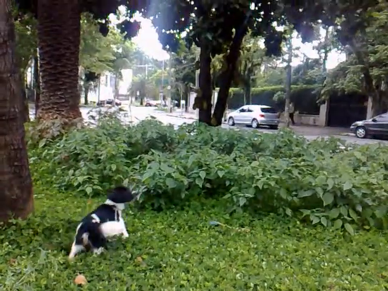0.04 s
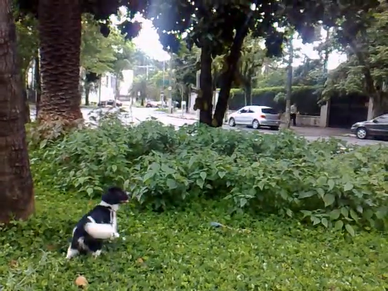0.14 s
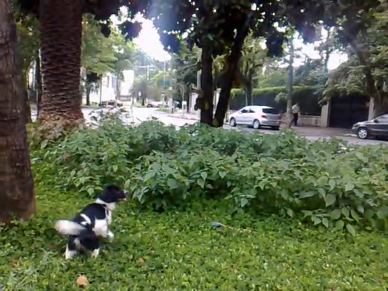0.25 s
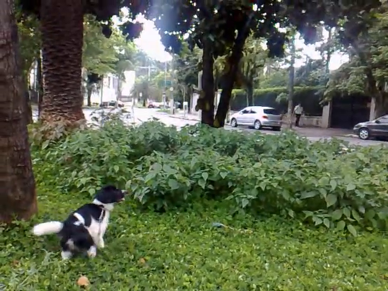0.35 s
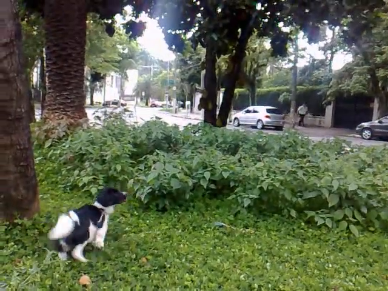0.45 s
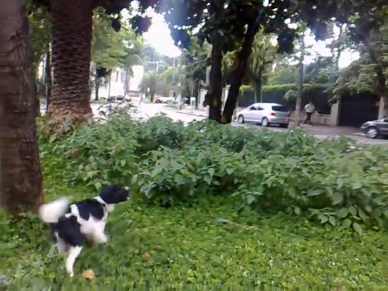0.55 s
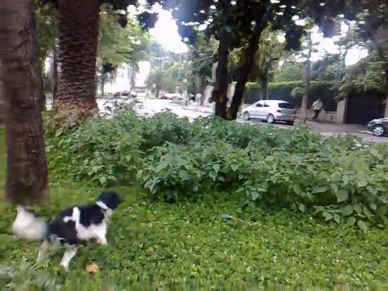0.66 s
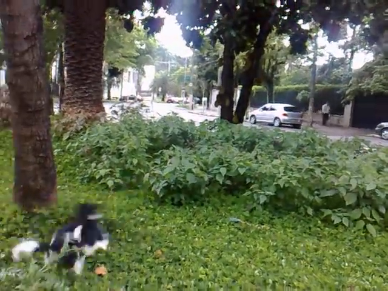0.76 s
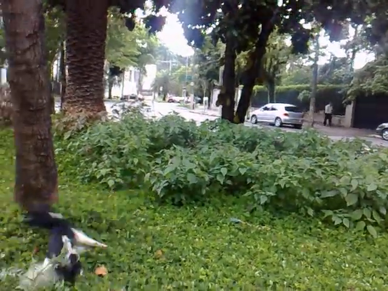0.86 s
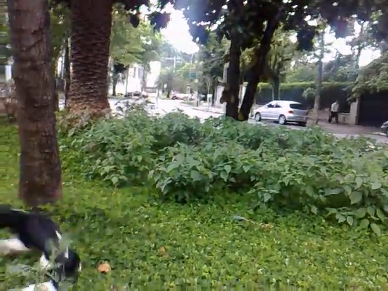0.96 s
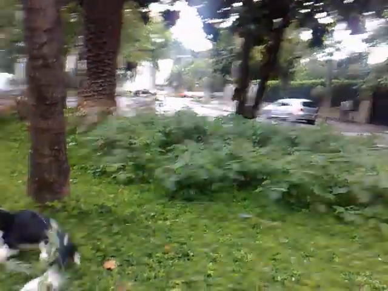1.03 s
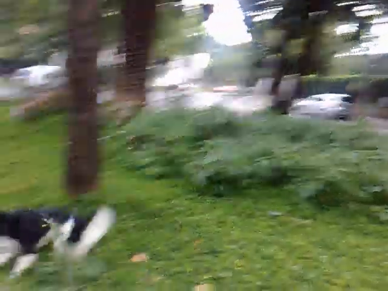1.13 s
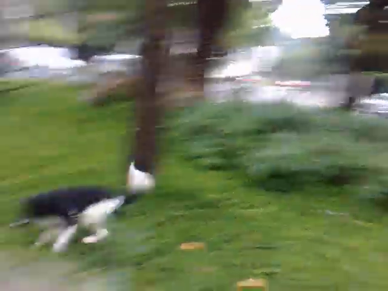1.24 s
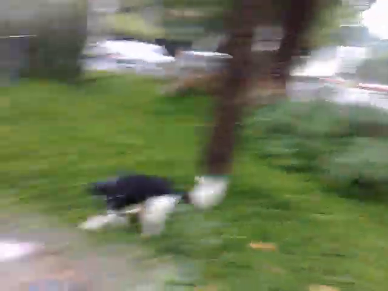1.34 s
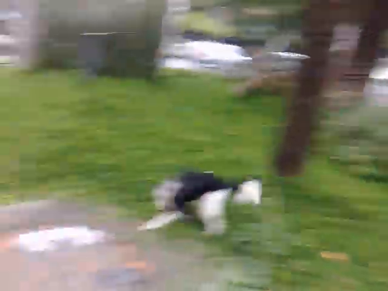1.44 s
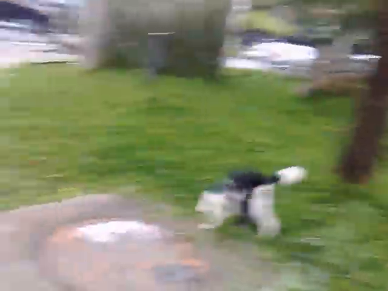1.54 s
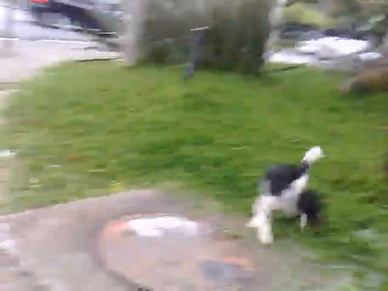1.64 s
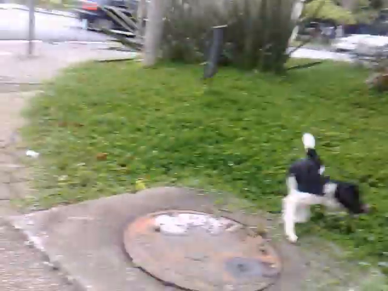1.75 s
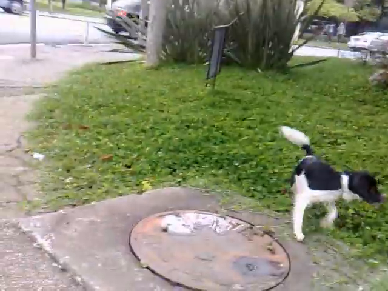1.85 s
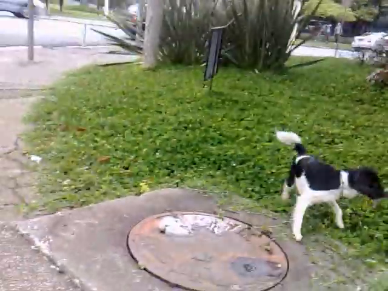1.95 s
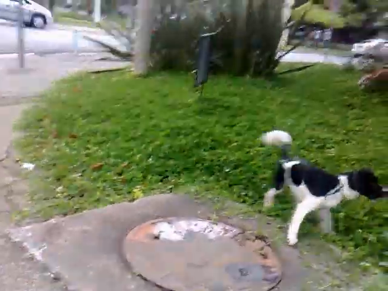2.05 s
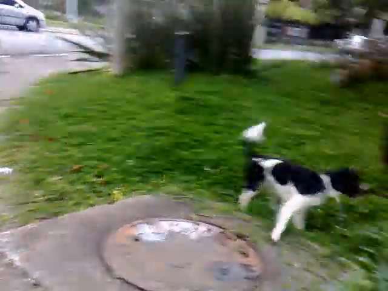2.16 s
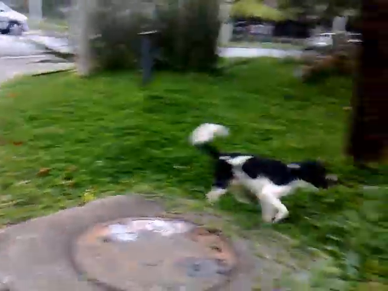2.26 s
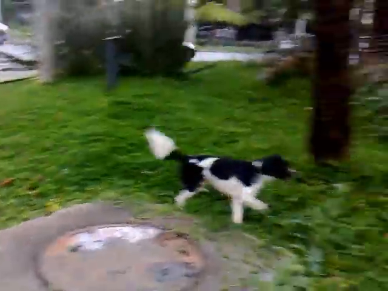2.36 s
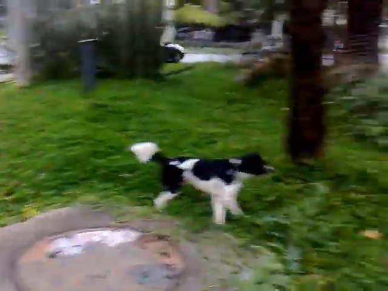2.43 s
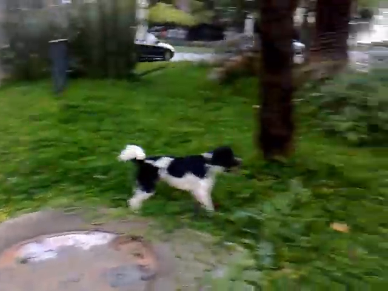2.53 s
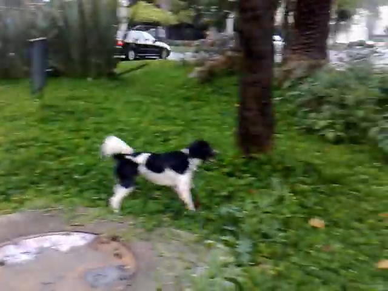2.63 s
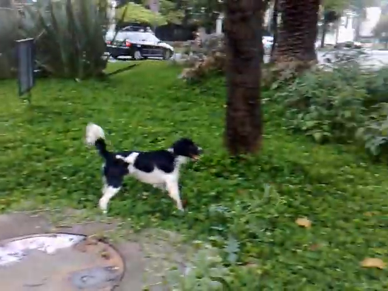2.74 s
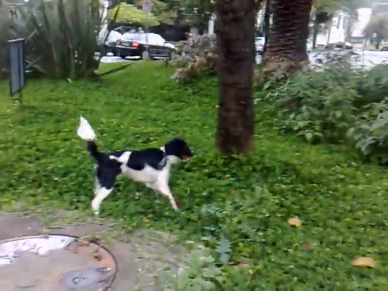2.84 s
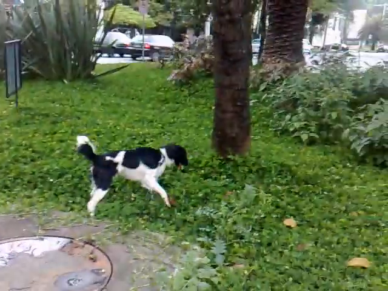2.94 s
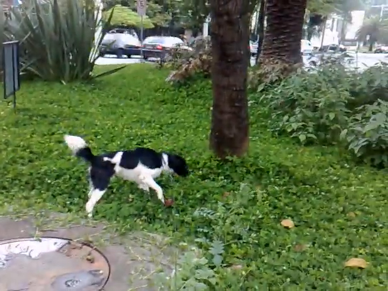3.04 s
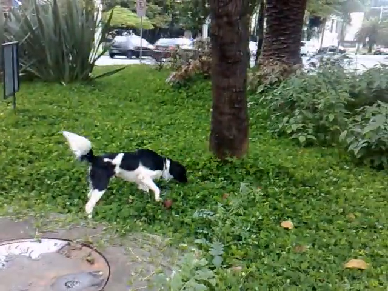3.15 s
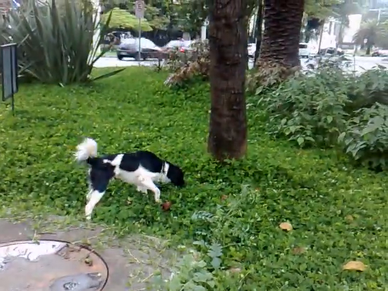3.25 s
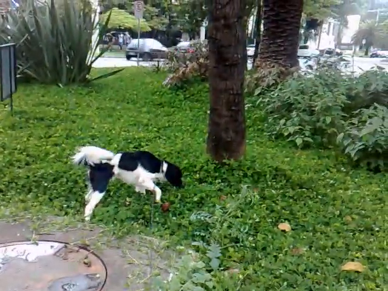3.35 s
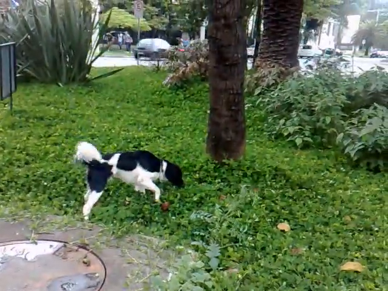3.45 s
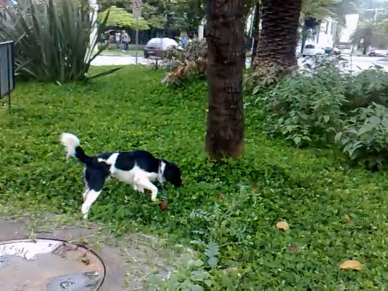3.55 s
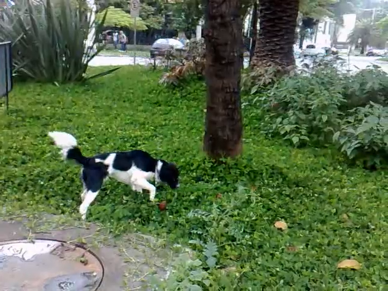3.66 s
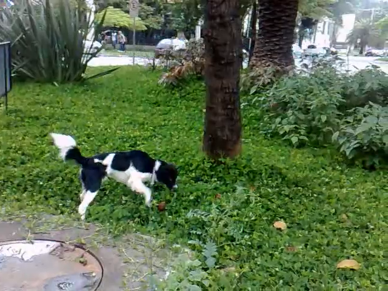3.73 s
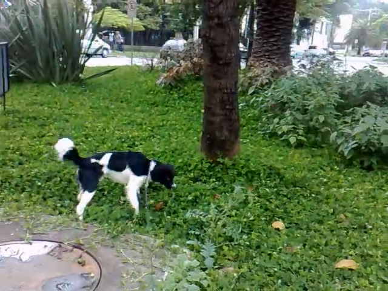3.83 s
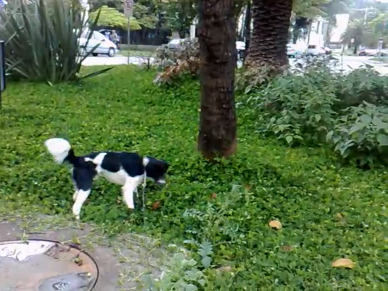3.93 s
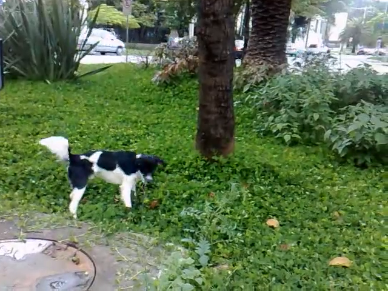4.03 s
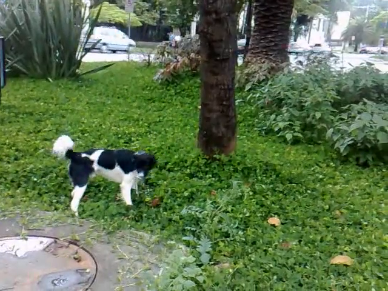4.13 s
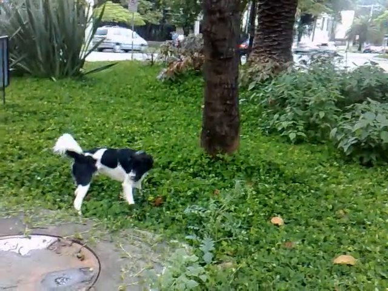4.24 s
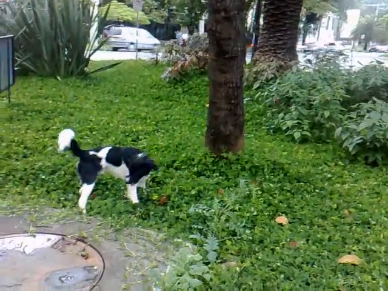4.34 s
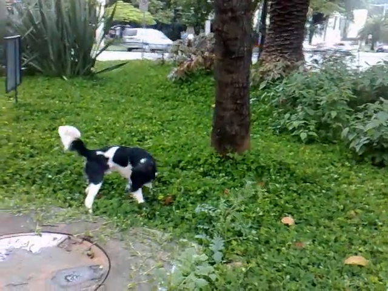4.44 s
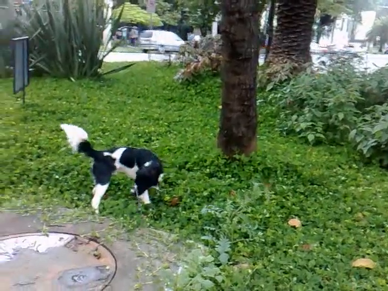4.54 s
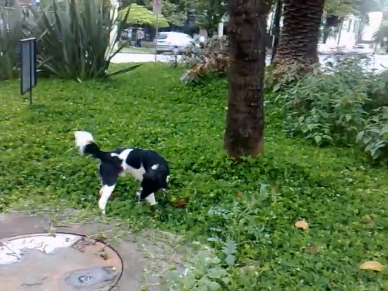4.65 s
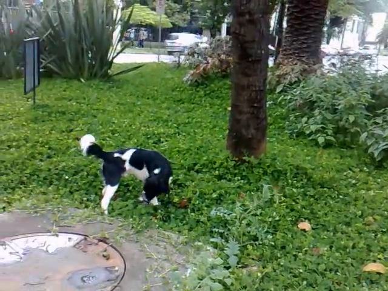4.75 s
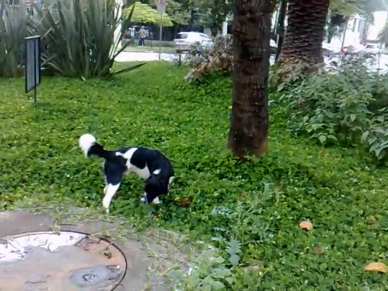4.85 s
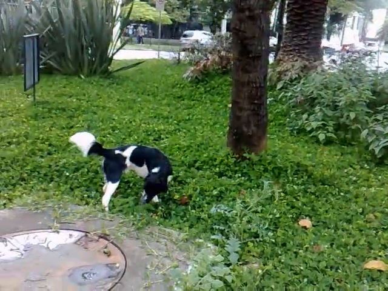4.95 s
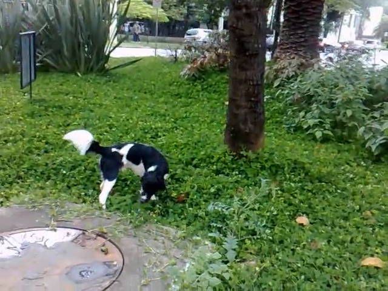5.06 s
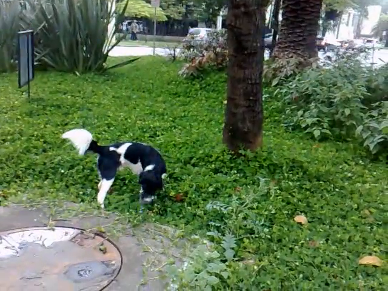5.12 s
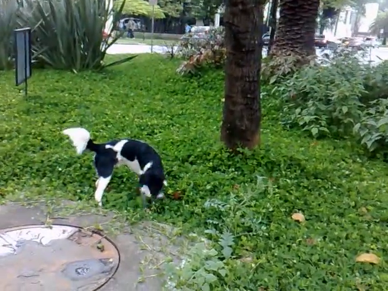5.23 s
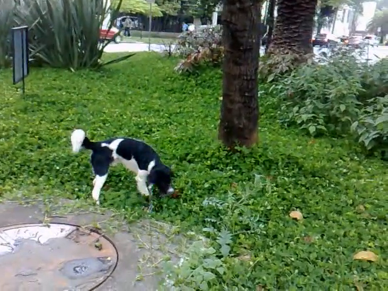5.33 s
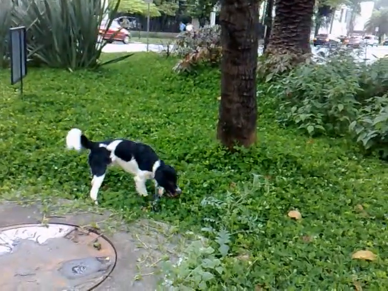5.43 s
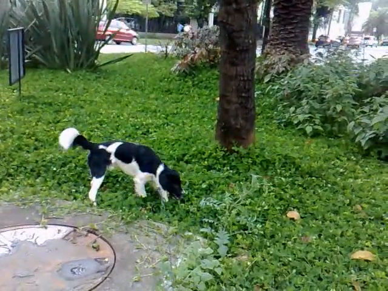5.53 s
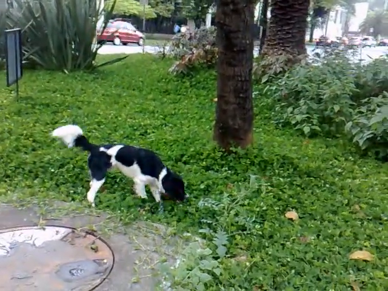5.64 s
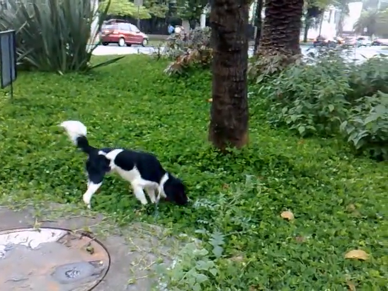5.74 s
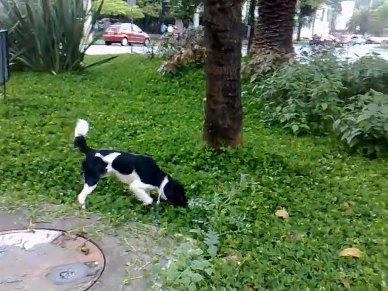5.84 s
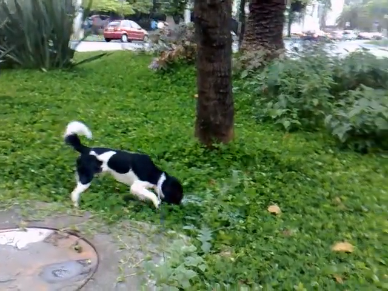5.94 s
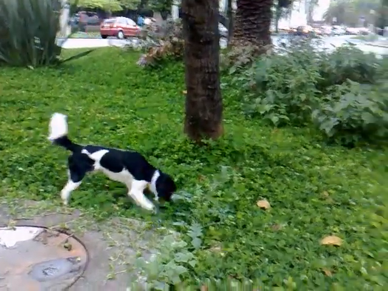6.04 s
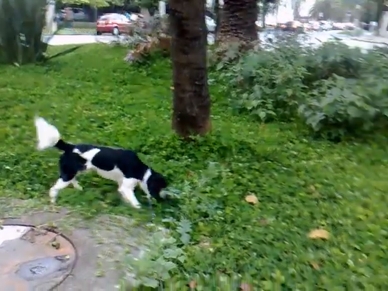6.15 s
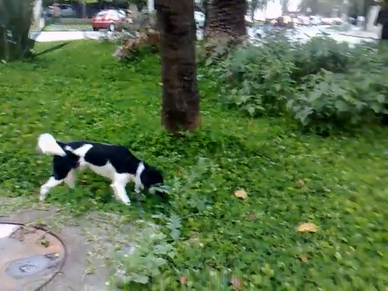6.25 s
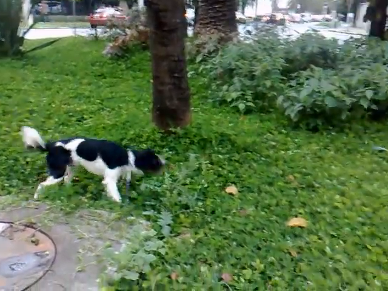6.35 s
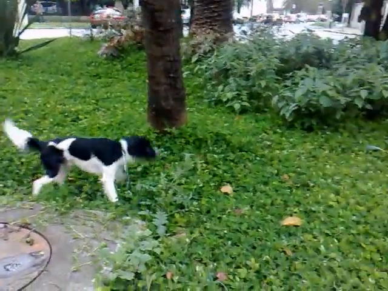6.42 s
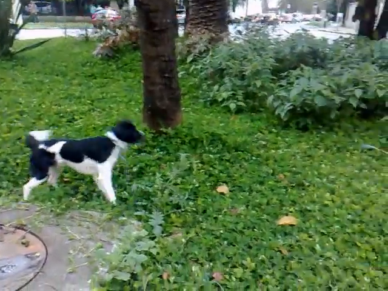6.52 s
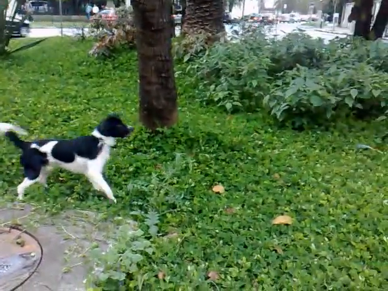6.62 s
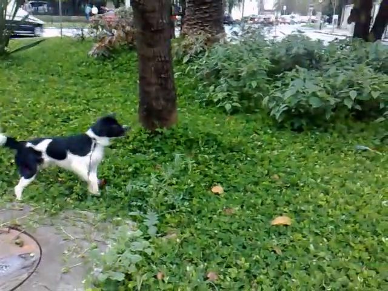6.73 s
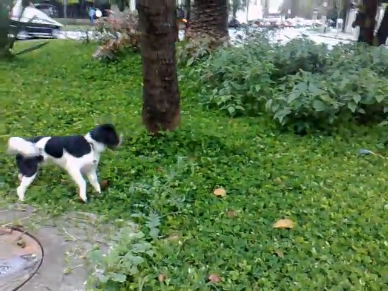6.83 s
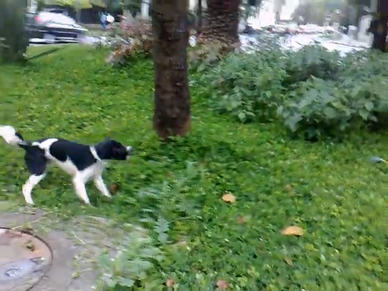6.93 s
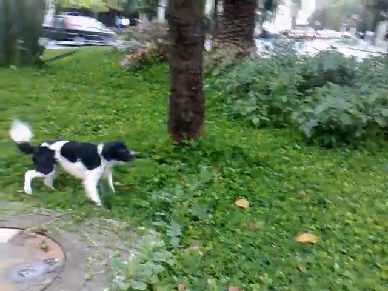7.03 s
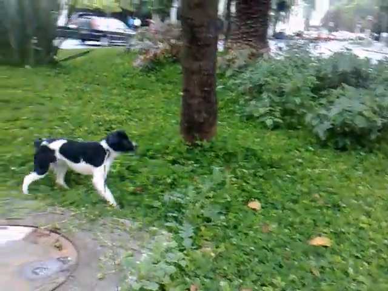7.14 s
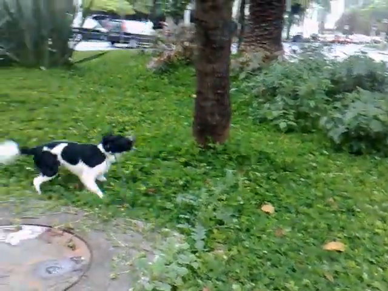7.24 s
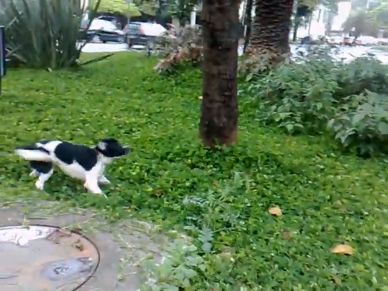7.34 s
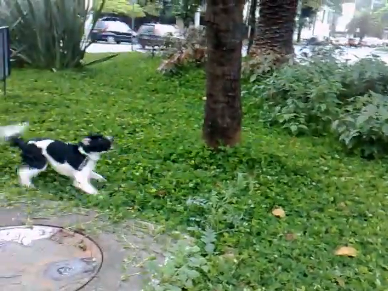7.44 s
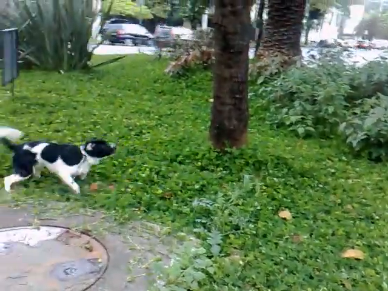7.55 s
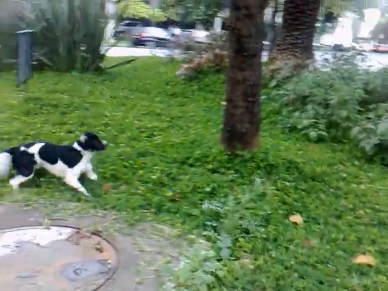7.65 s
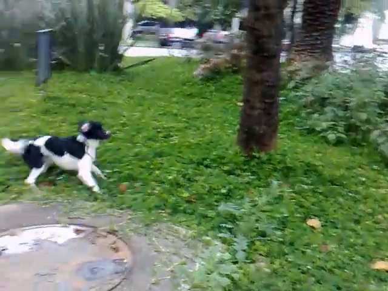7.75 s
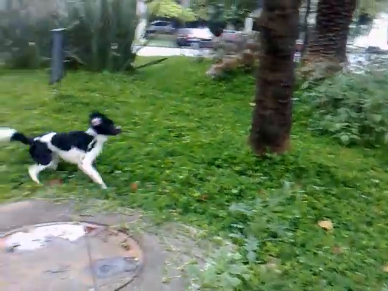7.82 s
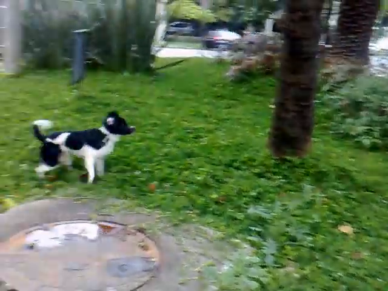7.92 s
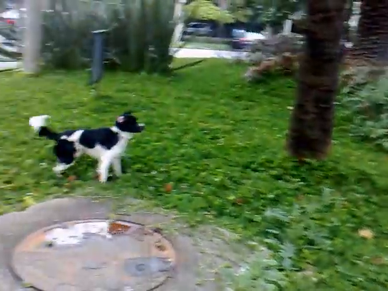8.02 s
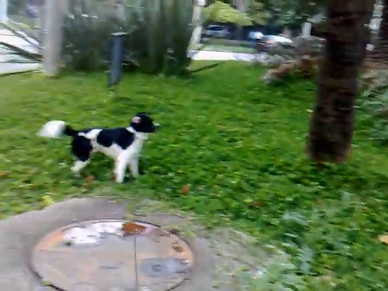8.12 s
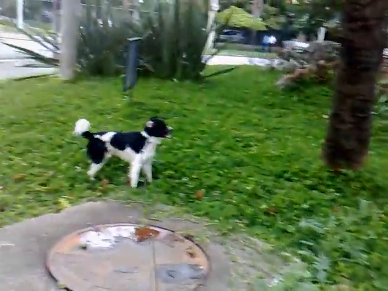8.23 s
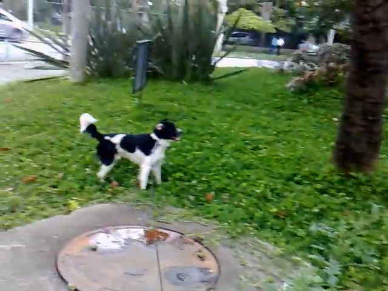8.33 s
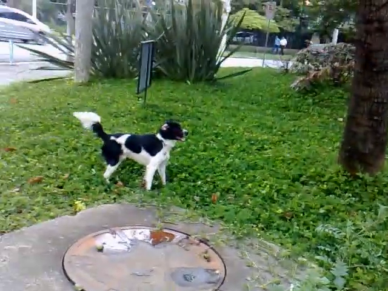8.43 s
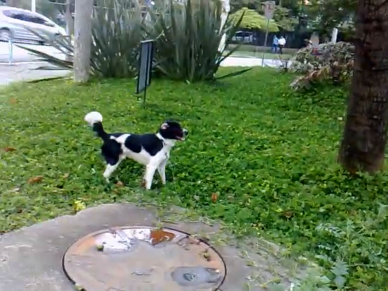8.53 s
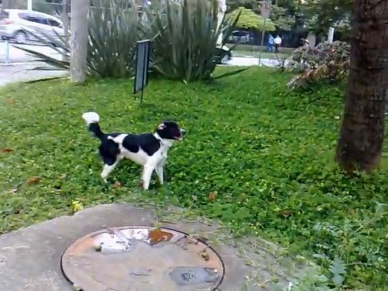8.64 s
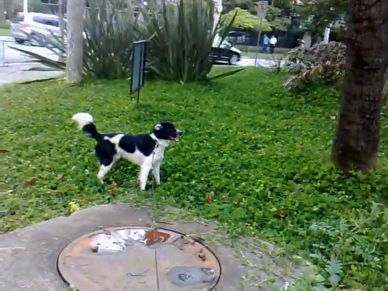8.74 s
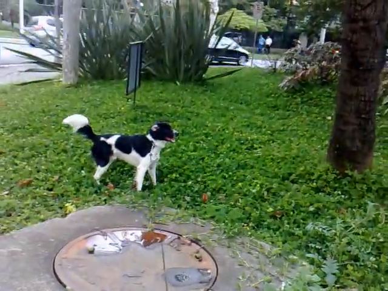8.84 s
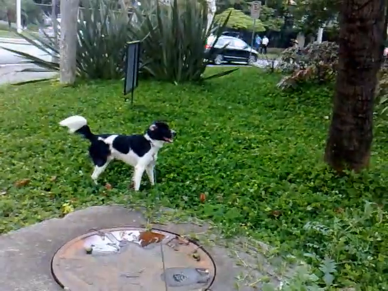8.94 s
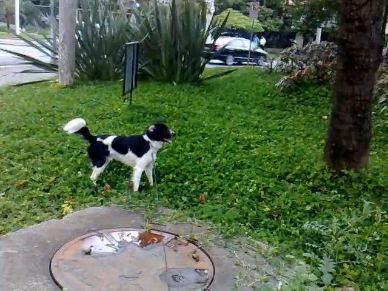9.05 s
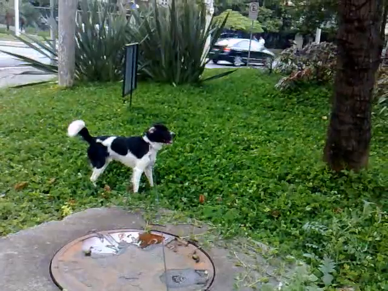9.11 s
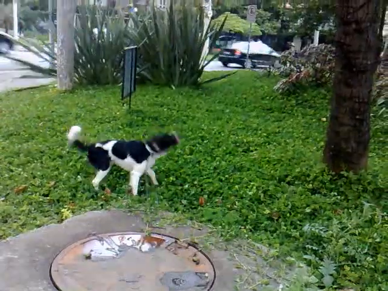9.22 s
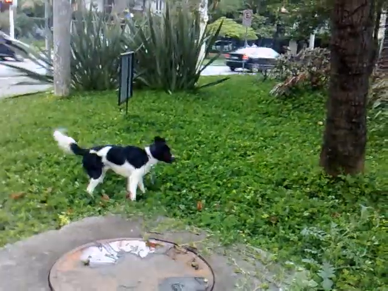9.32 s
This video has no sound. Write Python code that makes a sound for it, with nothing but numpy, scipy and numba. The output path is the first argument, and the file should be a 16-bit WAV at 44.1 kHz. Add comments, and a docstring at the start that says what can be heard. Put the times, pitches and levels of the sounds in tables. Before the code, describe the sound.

A steady hum of tyres and engines from a busy street runs throughout, with a faint high hiss behind it. At about 0.8 seconds a dog close to the microphone gives one short, harsh, high bark as a car passes. Paws rustle faintly in the leaves, and at 2.2 seconds something snaps once, sharply. More engines swell softly and fade around 3 and 5 seconds, and a distant brake squeals very faintly between 4 and 4.5 seconds. At 6.5 seconds the dog barks again with a brief leafy rustle, followed by three quick barks at about 7.1, 7.4 and 7.7 seconds. A last, slightly softer bark comes at the very end, near 9.4 seconds. The barks are loud and a little distorted, with a slight outdoor echo; the traffic dips after them and slowly comes back.

```python
"""Traffic hums on a busy street; then a dog close by on the grass gives the first of six short, harsh barks.
Tyres roar as broadband noise, exhausts swell and fade as harmonic tones, and a far brake sings faintly.
A faint high hiss lies behind. Paws rustle in the leaves, and something snaps once, ringing a hard body.
Each bark is a source and a filter: irregular vocal folds and turbulent breath excite throat and mouth.
The barks overload a small recorder, whose gain control ducks the street and slowly lets it back."""
import sys
import numpy as np
from scipy import signal
from scipy.fft import rfft, irfft, next_fast_len
from scipy.io import wavfile
from scipy.ndimage import uniform_filter1d
from numba import njit

SR = 44100
rng = np.random.default_rng(int(sys.argv[2]) if len(sys.argv) > 2 else 0)


def wav_out(sig):
    """Save sig, one row per channel (or a flat mono array), as 16-bit PCM at SR to the path in sys.argv[1]."""
    wavfile.write(sys.argv[1], SR, np.round(np.clip(np.atleast_2d(sig).T, -1, 1) * 32767).astype(np.int16))


N = 413658
TIME = np.arange(N) / SR

# spectral shapes of the four noises: frequency_hz, relative_density_db
HISS_SPECTRUM = [(3000, -15), (7000, 3), (10000, -3), (12000, -4.5), (15500, -5.5)]
TYRE_SPECTRUM = [(210, -17), (350, 0.5), (520, 0.5), (650, 1), (850, 3.5), (1350, 3), (1850, 1), (2380, -1),
                 (2950, 1), (3490, -4), (4200, -13), (5000, -19.5), (6500, -20.5), (8200, -38.5),
                 (15000, -48)]
RUMBLE_SPECTRUM = [(12, -38), (20, -18), (48, 3), (87, 0.5), (128, -3), (273, -4.5), (409, -16), (500, -15),
                   (650, -40), (1100, -120)]
LEAF_SPECTRUM = [(2000, -19), (6000, 17.5), (8500, 5), (12000, 6), (16000, -57)]
# envelope of the faint high background hiss: time_s, level_db
HISS_ENVELOPE = [(0, -52.5), (2.2, -60.5), (6.4, -55.5), (6.8, -72), (8.5, -69), (9.38, -58)]
# envelope of the traffic: time_s, level_db
TRAFFIC_ENVELOPE = [(0, -29.5), (.7, -30.5), (1.1, -29), (1.9, -31), (2.6, -31), (4.2, -29.5), (6.3, -30.5),
                    (6.8, -28.5), (8, -32), (9.38, -31.5)]
# engines of passing cars: peak_s, half_length_s, level_db, firing_hz, climb_hz_per_s
PASSING_ENGINES = [(0.76, 0.67, -28, 85.7, 3.5), (3.05, 0.56, -33, 96.44, 19),
                   (5.3, 0.41, -39.5, 85.6, -36), (9.3, 1, -40, 94.4, -17.5)]
# squeals of a far brake: peak_s, half_length_s, level_db
BRAKE_SQUEALS = [(4.047, 0.055, -51.5), (4.44, 0.17, -59)]
# paws in the leaves: peak_s, half_length_s, level_db
PAW_STEPS = [(.2, 0.3, -52), (0.744, 0.06, -49), (1.284, 0.023, -47), (1.496, 0.015, -47),
             (1.595, 0.0036, -46), (1.86, .005, -54), (2.9, .012, -54), (3.37, .012, -53),
             (6.504, 0.02, -33), (7.001, 0.041, -59.5), (8.094, 0.022, -58)]
# a sharp snap and its second crack: start_s, peak_db
CRACKS = [(2.2229, 1), (2.2323, -17)]
# modes of the body that snaps: centre_hz, width_hz, gain_db
CRACK_MODES = [(850, 480, -1.5), (1450, 430, 7), (2740, 520, 11.5), (3090, 250, 1.5), (3660, 280, 4),
               (8130, 2100, -13.5), (11240, 3200, -35)]
# echoes off trunks and house fronts: delay_s, gain_db
REFLECTIONS = [(.021, -31), (.083, -26)]
# one bark a row: full_voice_s, attack_s, hold_s, release_s, level_db, pitch_hz, mid_hold_pitch_hz,
# roughness_ratio, mouth_opening_s, brightness_db
BARK_GESTURES = [(0.774, 0.048, 0.076, 0.064, -1.5, 780, 682, .74, 0.058, 0.5),
                 (6.477, .022, 0.084, 0.057, 0.5, 702.5, 917, 0.71, 0.0078, 3),
                 (7.131, .012, 0.09, 0.0363, 0, 640.5, 900, 0.65, 0.037, 3),
                 (7.398, .030, .078, 0.056, 1, 621.8, 857.6, 0.6, .004, 5),
                 (7.655, .042, .058, .058, -1.5, 660.3, 803.3, 0.52, 0.031, 4),
                 (9.352, 0.019, 0.09, .06, -6.5, 696, 643, 0.68, 0.0062, 8)]
# throat and mouth resonances, one list a bark: centre_hz, width_hz, gain_db
BARK_FORMANTS = [
    [(684, 98, 1), (801, 125, 1), (1250, 78, 1.5), (1686, 220, -1), (2007, 67, -7), (2910, 100, -7)],
    [(710, 117, 3.5), (950, 14.3, 12), (1338, 190, 0.5), (1980, 440, -7), (2404, 240, -21), (3150, 66, -13)],
    [(653, 60, 2.5), (884, 120, 0), (1260, 260, -2), (1756, 174, 1), (2690, 160, -10.5), (2770, 54, -16)],
    [(684, 94, 10), (868, 72, 6.5), (1292, 130, 2.5), (1679, 79, 10), (2540, 310, -14.5), (2890, 66, -16)],
    [(670, 80, 5.5), (773, 220, 5), (1350, 160, 2.5), (1584, 55, 9), (2650, 59, -12), (3167, 24, -9)],
    [(726, 290, 11.5), (985, 310, -24), (1180, 120, 11), (1465, 57, 6), (2025, 90, 4), (2780, 450, -16.5)],
]
# a low band near 230 Hz and a harsh upper edge common to all barks: centre_hz, width_hz, gain_db
LOW_BAND_AND_EDGE = [(229, 36, -17), (4100, 1170, -30), (5830, 280, -32), (9200, 1800, -41)]


def from_db(db):
    """Decibels to amplitude ratio."""
    return 10 ** (np.asarray(db) / 20)


def unit_rms(x):
    """Normalisation to unit power."""
    return x / np.sqrt(np.mean(x ** 2) + 1e-20)


def butter(x, hz, kind, order=2):
    """Butterworth filter, maximally flat in its passband."""
    return signal.sosfilt(signal.butter(order, hz, kind, fs=SR, output="sos"), x)


def drift(rate_hz, size=N):
    """Random modulation: linear interpolation between Gaussian values drawn at rate_hz."""
    place = np.arange(size) * rate_hz / SR
    knots = rng.standard_normal(size // 20)
    return np.interp(place, np.arange(len(knots)), knots)


def swell(peak_s, half_length_s, level_db):
    """Gaussian envelope with standard deviation half_length_s."""
    return from_db(level_db) * np.exp(-((TIME - peak_s) / half_length_s) ** 2 / 2)


def coloured_noise(spectrum):
    """Spectral shaping of white noise, at unit power."""
    hz, db = np.transpose(spectrum)
    size = next_fast_len(N)
    bins_hz = np.maximum(np.fft.rfftfreq(size, 1 / SR), 1)
    gain = from_db(np.interp(np.log(bins_hz), np.log(hz), db))
    return unit_rms(irfft(rfft(rng.standard_normal(size)) * gain, size)[:N])


@njit
def resonator(x, w, r):
    """Damped two-pole oscillator with pole radius r and a moving centre w in radians a sample."""
    y = np.zeros(len(x))
    for i in range(2, len(x)):
        y[i] = (1 - r * r) / 2 * (x[i] - x[i - 2]) + 2 * r * np.cos(w[i]) * y[i - 1] - r * r * y[i - 2]
    return y


def resonate(x, modes, shift=1, tilt_db_per_octave=0):
    """Superposition of modes, each filtered twice for steep skirts; shift scales their centres."""
    out = 0
    for hz, width_hz, db in modes:
        r = np.exp(-np.pi * width_hz * np.sqrt(2) / SR)
        w = 2 * np.pi * hz * shift / SR * np.ones(len(x))
        octaves = np.clip(np.log2(hz / modes[0][0]), 0, 1.5)
        out += from_db(db + tilt_db_per_octave * octaves) * resonator(resonator(x, w, r), w, r)
    return out


def background_hiss():
    """Shaped noise: a faint high hiss that drops away around the run of barks and slowly returns."""
    return from_db(np.interp(TIME, *np.transpose(HISS_ENVELOPE))) * coloured_noise(HISS_SPECTRUM)


def traffic(waver_db=0.5):
    """Incoherent sources add up to noise: tyre roar over the rumble of many engines."""
    street_db = np.interp(TIME, *np.transpose(TRAFFIC_ENVELOPE))
    rumble = from_db(waver_db * drift(11)) * coloured_noise(RUMBLE_SPECTRUM)
    return from_db(street_db) * (coloured_noise(TYRE_SPECTRUM) + rumble)


def engine(peak_s, half_length_s, level_db, firing_hz, climb_hz_per_s, overtone_db=-10, throb_db=4.0):
    """Periodic exhaust pulses radiate harmonics of the firing rate; the lowest three are heard."""
    hz = (firing_hz + climb_hz_per_s * (TIME - peak_s)) * (1 + 0.0189 * drift(15))
    phase = 2 * np.pi * np.cumsum(hz) / SR
    orders = sum(from_db(overtone_db * k + throb_db * drift(15)) * np.sin((k + 1) * phase)
                 for k in range(3))
    return swell(peak_s, half_length_s, level_db) * unit_rms(orders)


def brake(pitch_hz=8730, wander_hz=45, shiver_hz=110):
    """Random amplitude modulation spreads a tone into a thin, unsteady squeal."""
    phase = 2 * np.pi * np.cumsum(pitch_hz + wander_hz * drift(9)) / SR
    shiver = unit_rms(butter(rng.standard_normal(N), shiver_hz, "low"))
    return sum(swell(*row) for row in BRAKE_SQUEALS) * np.sqrt(2) * shiver * np.sin(phase)


def paws(grain_db=4.5):
    """Each step brushes the leaves into fine crackle: noise under fast amplitude modulation."""
    crackle = unit_rms(coloured_noise(LEAF_SPECTRUM) * from_db(grain_db * drift(400)))
    return sum(swell(*row) for row in PAW_STEPS) * crackle


def snap(splinter_gap_s=0.0027, splinter_db=-16.5):
    """Impulse response: each crack and its three weaker splinters ring a small hard body."""
    ring = resonate(signal.unit_impulse(1000, 2), CRACK_MODES)
    ring /= np.abs(ring).max()
    splinters = [(start_s + splinter_gap_s * (k + 1 + rng.uniform(-0.33, 0.34)), db + splinter_db)
                 for start_s, db in CRACKS for k in range(3)]
    out = np.zeros(N)
    for start_s, db in CRACKS + splinters:
        start = int(start_s * SR)
        out[start:start + len(ring)] += from_db(db) * ring
    return out


def outdoors(x, near_db=-17, near_t60_s=0.19, far_db=-23, far_t60_s=1.0):
    """Reflection: bright, short scatter from leaves and trunks; dull echoes and a tail from the street."""
    t = TIME[:SR]
    near, far = rng.standard_normal((2, SR))
    near *= from_db(-60 * t / near_t60_s) * (t > 0.004)
    near = butter(near, 2600, "high", order=1) * from_db(near_db) / np.linalg.norm(near)
    far *= from_db(-60 * t / far_t60_s) * (1 - np.exp(-t / 0.034))
    far = butter(far, 600, "high") * from_db(far_db) / np.linalg.norm(far)
    for delay_s, db in REFLECTIONS:
        far[int(delay_s * SR)] += from_db(db)
    return x + signal.fftconvolve(x, near + butter(far, 2800, "low"))[:N]


def vocal_folds(pitch_hz, roughness, jitter=0.042, subharmonic=1.66, flutter=0.77, rasp=4.5):
    """Irregular oscillation: ten harmonics, with sidebands and turbulence that grow with roughness."""
    size = len(pitch_hz)
    phase = 2 * np.pi * np.cumsum(pitch_hz * (1 + jitter * roughness * drift(345.8, size))) / SR
    pulses = unit_rms(sum(np.cos(k * phase) / k ** 0.054 for k in range(1, 11)))
    # strong and weak cycles alternate or come at random, filling the gaps between the harmonics
    alternation = subharmonic * np.cos(phase / 2 + drift(50.6, size))
    pulses *= 1 + roughness * (alternation + flutter * drift(694, size))
    turbulence = unit_rms(rng.standard_normal(size) * (1 + np.cos(phase)))   # one puff a cycle
    return (1 - np.clip(roughness, 0, 1) ** 2) * pulses + rasp * roughness ** 2 * turbulence


def formant_filter(source, formants, jaw, mouth_db):
    """Resonance: a wide mouth raises the formants and lets out the upper ones; a low band and a harsh edge are
    added."""
    low = resonate(source, formants[:2], shift=jaw ** 0.89)
    high = resonate(source, formants[2:] + LOW_BAND_AND_EDGE, shift=jaw ** 0.39,
                    tilt_db_per_octave=0.72 * mouth_db)
    return low + from_db(mouth_db) * high


def bark(gesture, formants, scoop_octaves=0.1474, drop_octaves=0.65, jaw_octaves=0.096,
         swell_db=3.5, edge_db=-21.5, shut_db=-12.5, closing_db=-3.5, relax_s=0.035):
    """Source-filter voice: one push of the chest moves pitch, roughness, mouth and level together."""
    voice_s, attack_s, hold_s, release_s, level_db, hz, mid_hz, rough, opening_s, bright_db = gesture
    span = (TIME >= voice_s - attack_s) & (TIME <= voice_s + hold_s + release_s)
    t = TIME[span] - voice_s
    onset = np.clip(-t / attack_s, 0, 1)   # 1 to 0 through the attack
    arch = np.sin(np.pi * np.clip(t / hold_s, 0, 1))   # effort peaks in mid hold
    ending = np.clip((t - hold_s) / release_s, 0, 1)   # 0 to 1 through the release

    pitch_hz = (hz + (mid_hz - hz) * arch ** 2) * 2 ** (-scoop_octaves * onset - drop_octaves * ending)
    relaxed = np.clip((t - hold_s + relax_s) / (2 * relax_s), 0, 1)
    roughness = rough * (1 + 0.21 * arch - 0.45 * relaxed)   # strain roughens, relaxing clears
    source = vocal_folds(pitch_hz, roughness)

    shut = np.clip((opening_s - t) / (opening_s + attack_s), 0, 1)
    mouth_db = bright_db + shut_db * shut + closing_db * ending
    jaw = 2 ** (jaw_octaves * arch ** 2) * np.minimum(pitch_hz / 590, 1)   # closes as the pitch sinks
    voice = formant_filter(source, formants, jaw, mouth_db)
    voice /= np.sqrt(uniform_filter1d(voice ** 2, size=300) + 1e-12)   # the envelope alone sets the level

    # powers under 1: the voice breaks in late and drops off early
    envelope_db = level_db + swell_db * arch + edge_db * (onset ** 0.59 + ending ** 0.92)
    out = np.zeros(N)
    out[span] = from_db(envelope_db) * voice * signal.windows.tukey(len(t), 0.06)
    return out


def scene():
    """Superposition of the dog close by and the street and faint hiss behind it."""
    dog = sum(bark(gesture, formants) for gesture, formants in zip(BARK_GESTURES, BARK_FORMANTS))
    background = traffic() + background_hiss() + sum(engine(*row) for row in PASSING_ENGINES) + brake()
    return np.array([outdoors(dog + snap()) + paws() + background])


def gain_control(x, limit_db=-7.0, release_db_per_s=8.0, attack_s=0.0005):
    """Limiting: power above the limit pulls the gain down at once; it creeps back at a steady rate."""
    power = signal.lfilter(np.ones(256) / 256, [1], x ** 2)
    excess_db = np.maximum(10 * np.log10(power + 1e-12) - limit_db, 0)
    recovery_db = release_db_per_s * TIME
    held_db = np.maximum.accumulate(excess_db + recovery_db) - recovery_db
    pole = np.exp(-1 / (attack_s * SR))
    return x * from_db(-signal.lfilter([1 - pole], [1, -pole], held_db))


def record(dry, ceiling=0.71, knee=5.4, cutoff_hz=15800):
    """Saturation rounds the peaks that pass the gain control; a steep low-pass cuts the top."""
    x = gain_control(dry[0])
    x = x / (1 + np.abs(x / ceiling) ** knee) ** (1 / knee)
    return signal.sosfilt(signal.ellip(10, 0.1, 80, cutoff_hz, fs=SR, output="sos"), x)[None]


dry = scene()
out = record(dry)
wav_out(out)
```